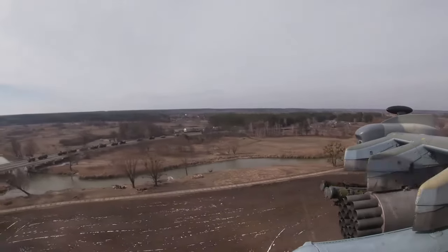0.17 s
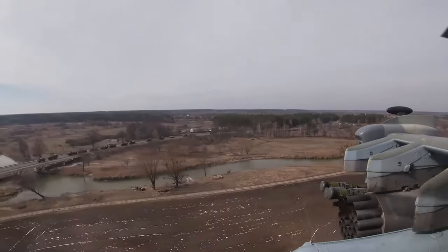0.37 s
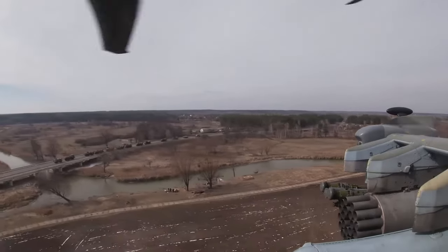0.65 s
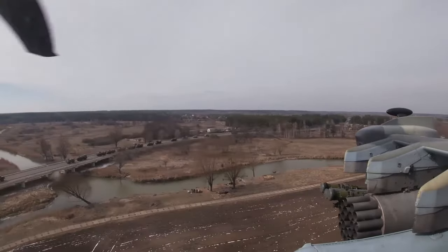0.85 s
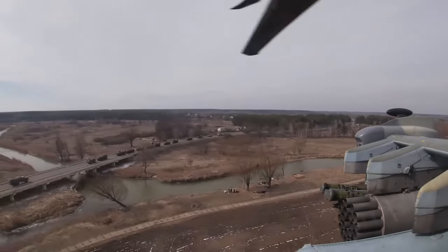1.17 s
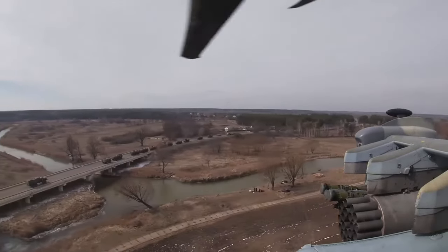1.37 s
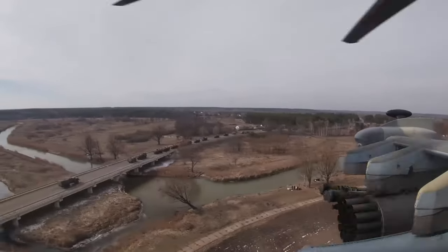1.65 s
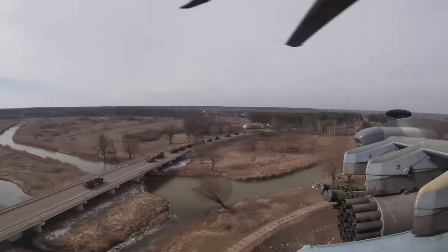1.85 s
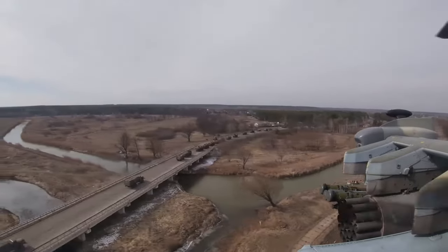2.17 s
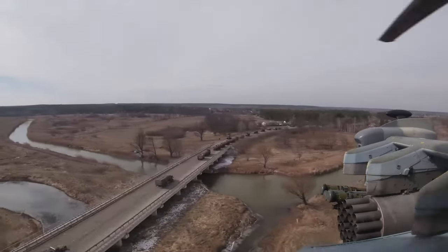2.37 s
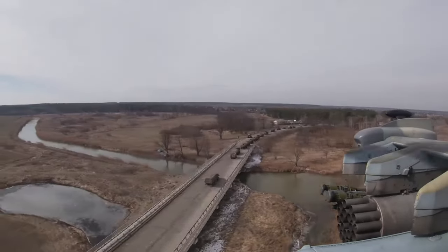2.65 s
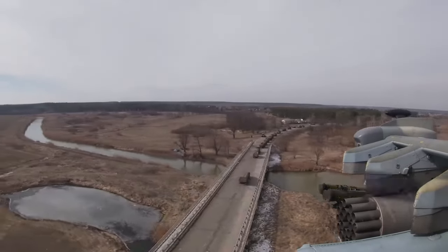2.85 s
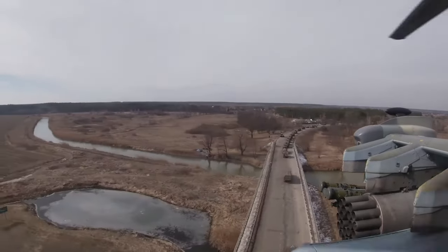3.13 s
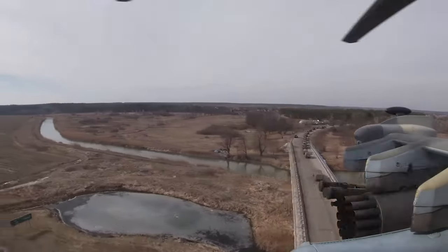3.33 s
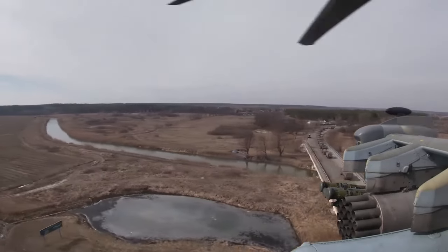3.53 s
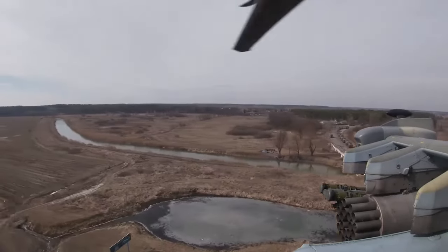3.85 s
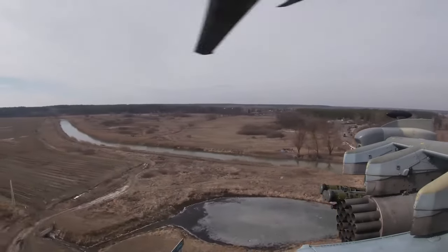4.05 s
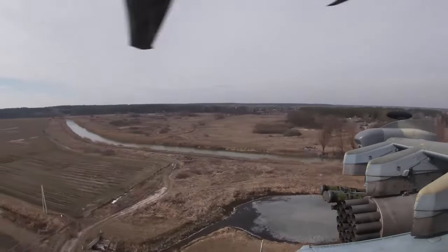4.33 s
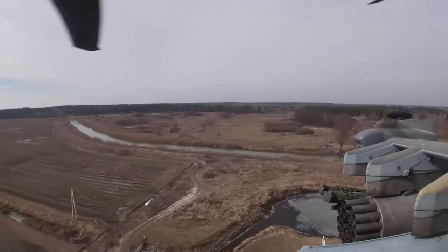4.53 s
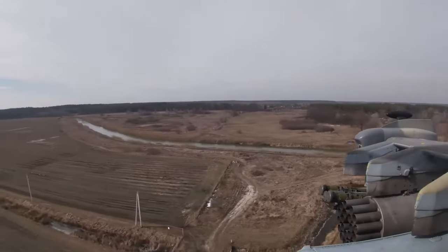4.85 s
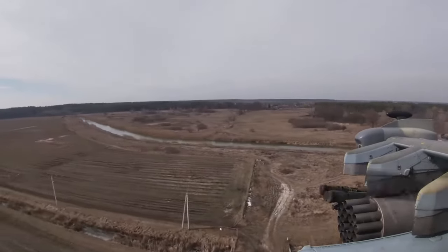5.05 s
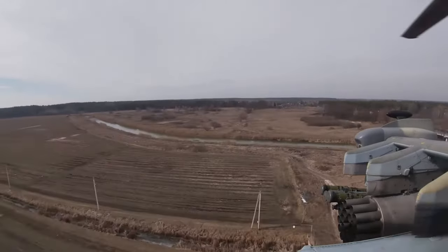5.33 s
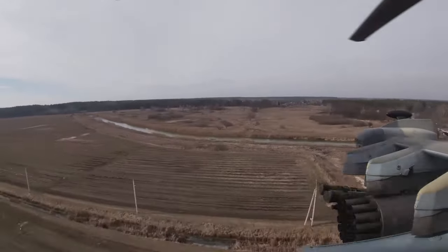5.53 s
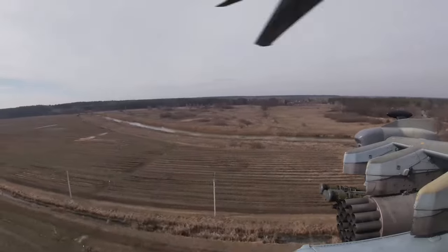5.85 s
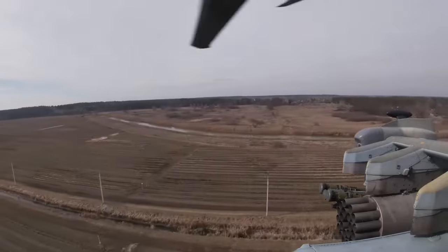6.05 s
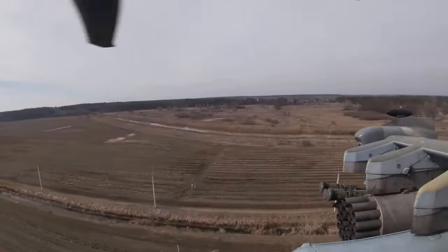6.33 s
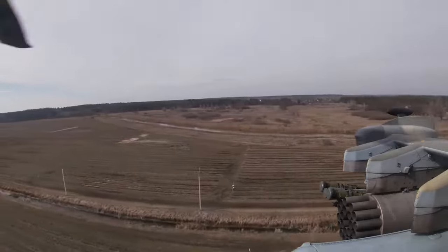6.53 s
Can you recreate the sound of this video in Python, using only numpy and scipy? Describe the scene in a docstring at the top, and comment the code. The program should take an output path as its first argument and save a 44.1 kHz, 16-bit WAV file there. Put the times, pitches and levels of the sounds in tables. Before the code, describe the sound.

A helicopter in low, fast flight is heard from a microphone fixed to its hull for about six and a half seconds. The main rotor throbs deep and fast throughout, mixed with rumbling, buffeting air and a strong, steady gearbox hum. In the first half second the blades give a quick run of raspy slaps over a hiss that clears soon after one second. The tail rotor adds a low drone, strongest around two seconds, and the turbine hisses faintly. Soft gusts howl along the hull near 1, 2, 3 and 3.7 seconds. A thin, high gear whine swells from about 1.5 to 3.3 seconds, drops back, and rises again around 6 seconds. Rotor and gear pitches sag very slightly around 4 seconds and recover by 6, with the throb sitting a little higher after the dip. The sound continues at full strength to the end.

```python
"""On the airframe of a helicopter in low, fast flight, heard from a camera fixed to the hull.
The main rotor throbs under buffeting air, and its blades slap a few times at the start.
The gearbox hums and whines, the tail rotor drones, the turbine hisses and gusts howl softly.
Rotor and gear pitches ride on the rotor speed, which sags once and recovers."""
import sys
import numpy as np
from scipy import signal
from scipy.fft import rfft, irfft, next_fast_len
from scipy.io import wavfile
from scipy.ndimage import uniform_filter1d, minimum_filter1d

SR = 44100
rng = np.random.default_rng(int(sys.argv[2]) if len(sys.argv) > 2 else 0)


def digitize_waveform(pressure):
    """Quantize a signal to 16-bit integers and store it at the path in sys.argv[1].

    Rows of a 2-D input are taken as channels; values are limited to [-1, 1].
    """
    field = np.atleast_2d(pressure).T
    bounded = np.clip(field, -1, 1)
    quanta = np.round(bounded * 32767).astype(np.int16)
    wavfile.write(sys.argv[1], SR, quanta)


N = 295181
T = np.arange(N) / SR
SHAFT_HZ, BLADES = 5.187, 3  # main rotor; rotor and gear pitches are given at nominal speed


def amp(db):
    """Decibels to gain."""
    return 10 ** (np.asarray(db) / 20)


def curve(rows):
    """An automation lane: straight lines through (time_s, value) points."""
    return np.interp(T, *np.transpose(rows))


def wander(rate_hz):
    """Smooth random modulation, rms 1, rolling off above the rate."""
    size = next_fast_len(N, True)
    hz = np.fft.rfftfreq(size, 1 / SR)
    rolloff = np.exp(-(hz / rate_hz) ** 2) * (hz > 0)
    motion = irfft(rfft(rng.standard_normal(size)) * rolloff, size)[:N]
    return motion / motion.std()


def coloured(x, spectrum):
    """An EQ that gives white noise of rms 1 the spectrum's power per Hz."""
    hz = np.fft.rfftfreq(N, 1 / SR)
    points_hz, points_db = np.transpose(spectrum)
    gain = amp(np.interp(np.log(hz + 1), np.log(points_hz), points_db, left=-200, right=-200))
    return irfft(rfft(x) * gain, N) * np.sqrt(SR / 2)


def noise(spectrum):
    """Noise with the given power per Hz."""
    return coloured(rng.standard_normal(N), spectrum)


def tone(cycles, db):
    """A sine of the given rms level with a random starting phase."""
    return np.sqrt(2) * amp(db) * np.sin(2 * np.pi * (cycles + rng.random()))


def noise_band(hz, width_hz):
    """A narrow band of noise, rms 1, that follows a pitch curve."""
    angle = 2 * np.pi * np.cumsum(hz) / SR
    return wander(width_hz) * np.cos(angle) + wander(width_hz) * np.sin(angle)


def blade_beat(clock, lag_s=0.0, sharpness=0.4):
    """A modulator: one short push from each passing blade."""
    passing = 2 * np.pi * BLADES * SHAFT_HZ * (clock - lag_s)
    return np.cos(passing) + sharpness * np.cos(2 * passing)


def compressor_whistle(level_db=-91, image_db=-103, width_hz=65, converter_hz=24000):
    """The compressor's faint, airy whistle, and its mirror image from the camera's converter."""
    # glide of the whistle: time_s, pitch_hz
    glide = [(0, 11010), (0.8, 11055), (2.2, 10995), (3.45, 10825), (4.6, 11020), (5.4, 11060),
             (6.65, 10950)]
    hz = curve(glide)
    whistle = noise_band(hz, width_hz) * amp(level_db)
    return whistle + noise_band(converter_hz - hz, width_hz) * amp(image_db)


def edge_howl(calm_db=-60.5, calm_hz=523.7, rise_hz_per_db=3.5, width_hz=65):
    """Eddies shed from an edge of the hull howl louder and higher in each gust."""
    # gusts over the edge: peak_s, level_db, half_width_s
    gusts = [(0.9, -48, .2), (1.821, -52, .22), (3.102, -53, .22), (3.678, -48.5, .3)]
    swells = sum(amp(db) * np.exp(-((T - peak_s) / half_s) ** 2) for peak_s, db, half_s in gusts)
    strength = np.hypot(amp(calm_db), swells)
    hz = calm_hz + rise_hz_per_db * (20 * np.log10(strength) - calm_db)
    return noise_band(hz, width_hz) * strength


def turbine_hiss(downwash, throb_db=0.4, flicker_db=0.4):
    """The turbine exhaust hisses and flutters in the downwash."""
    # colour of the exhaust: frequency_hz, density_db (power per Hz)
    spectrum = [(1400, -115), (1900, -88), (2150, -90), (2520, -89), (2830, -93.5), (3300, -93),
                (4000, -99.5), (4350, -99), (4730, -96), (5100, -100.5), (5500, -100), (5900, -106),
                (6200, -112.5), (7000, -122), (8200, -133), (11000, -125), (13000, -132), (14500, -148)]
    return noise(spectrum) * amp(throb_db * downwash + flicker_db * wander(25))


def tip_sizzle(beat, chop_db=3.0, uneven_db=0.2, grain_db=2.3):
    """Each blade tip adds a grainy sizzle as it passes."""
    # colour of the sizzle: frequency_hz, density_db
    spectrum = [(7000, -136), (9500, -130), (11300, -124), (13000, -131), (14000, -148)]
    return noise(spectrum) * amp(chop_db * beat + uneven_db * wander(28) + grain_db * wander(600))


def accessory_gear(speed, clock, pitch_hz=1192.7, core_db=-3.0, flicker_db=2, skirt_db=-3.5):
    """An accessory gear rings thinly and unevenly: a flickering core in a blurred skirt."""
    # fader on core and skirt together: time_s, gain_db
    fader = [(0, -55), (.35, -58), (.65, -63), (2.2, -62), (2.6, -66.5), (3.9, -64.5), (4.4, -63), (5, -59),
             (5.4, -64.5), (6.65, -66)]
    core = tone(pitch_hz * clock, core_db + flicker_db * wander(9.2))
    skirt = noise_band(pitch_hz * speed, width_hz=15) * amp(skirt_db)
    return (core + skirt) * amp(curve(fader))


def tail_rotor(clock, pitch_hz=103.3, octave_db=-12.5, flutter_db=1.0, drift_cycles=.03):
    """The tail rotor drones with a weak octave and beats against the main rotor."""
    # swell of the drone: time_s, level_db
    drone_level = [(0, -42.5), (.6, -39), (1.4, -36.5), (2, -35.5), (2.4, -40), (3.2, -40), (4.4, -44.5),
                   (5.5, -41.5), (6.3, -39.5)]
    db = curve(drone_level)
    cycles = pitch_hz * clock + drift_cycles * wander(3.5)
    drone = tone(cycles, db + flutter_db * wander(7))
    return drone + tone(2 * cycles, db + octave_db + flutter_db * wander(6))


def gearbox(clock, mesh_hz=368.0, whine_hz=1996.7, hum_flutter_db=0.22, whine_flutter_db=1.05,
            lesser_flutter_db=2.0, whine_drift_cycles=0.063, lesser_drift=.1):
    """Gear teeth sing through the airframe: a strong hum, a high whine and many lesser tones."""
    # main gear hum, softer while the rotor sags: time_s, level_db
    hum_level = [(0, -35.5), (.8, -34), (1.4, -32.5), (2.2, -33.5), (3, -33.5), (3.6, -35), (3.95, -36),
                 (4.55, -36.5), (5.3, -34.5), (6, -34), (6.65, -34.8)]
    # whine of the fast stage, two slow swells, the first with a brief crest: time_s, level_db
    whine_level = [(0, -68), (0.6, -67), (1.28, -61.5), (1.6, -57.5), (2.2, -56.5), (2.98, -59),
                   (3.26, -54), (3.4, -67), (4.2, -66.5), (5.1, -69.5), (5.57, -63), (5.66, -68.5),
                   (5.76, -62), (6.38, -58), (6.65, -62.5)]
    # lesser shaft and gear tones: pitch_hz, level_db
    lesser_tones = [(84.8, -46), (354.1, -51.5), (497.1, -58), (736.0, -62), (886.9, -77.5), (1104.1, -77),
                    (1473, -75), (2296.0, -76), (2374.5, -75.5), (2505.6, -76.5)]
    hum = tone(mesh_hz * clock, curve(hum_level) + hum_flutter_db * wander(30))
    whine_cycles = whine_hz * clock + whine_drift_cycles * wander(17)
    whine = tone(whine_cycles, curve(whine_level) + whine_flutter_db * wander(22))
    lesser = 0
    for hz, db in lesser_tones:
        twist = lesser_drift * np.sqrt(hz / mesh_hz) * wander(5.5)  # shaft twist blurs fast gears most
        lesser += tone(hz * clock + twist, db + lesser_flutter_db * wander(10))
    return hum + whine + lesser


def blade_slaps(trim_db=-1.5, wake_db=-3.0, wake_s=1.0, grain_db=2.5, crack_db=-1, crack_s=.001):
    """Blades cut the wake of the blade before: cracks in short rasps, over a hiss that soon clears."""
    # blade strikes: start_s, gain_db, rise_s
    strikes = [(0.0, 2, .003), (.054, 7.5, .0058), (.120, 7, .006), (.185, 6, .004), (.2585, 14.5, .0019),
               (.377, 8, .0058), (.445, 5.5, .004)]
    # slap EQ, with three broad hull resonances: frequency_hz, density_db
    hull_colour = [(400, -92.5), (900, -84.5), (1300, -84), (1550, -80.5), (1850, -86.5), (2350, -83),
                   (3100, -96), (3800, -97.5), (4200, -92.5), (4750, -90.5), (5600, -101), (6400, -110),
                   (8200, -127), (11000, -123), (14000, -145)]
    bursts, cracks = 0, np.zeros(N)
    for start_s, db, rise_s in strikes:
        age = np.maximum(T - start_s, 0) / rise_s
        bursts += amp(db) * age * np.exp(1 - age)
        # one impulse at the peak packs the energy of crack_s of noise
        cracks[round((start_s + rise_s) * SR)] = amp(db + crack_db) * np.sqrt(crack_s * SR)
    wake = amp(wake_db) * np.exp(-np.minimum(T / wake_s, 2) ** 4)
    rasps = rng.standard_normal(N) * np.hypot(bursts * amp(grain_db * wander(700)), wake)
    return coloured(rasps + cracks, hull_colour) * amp(trim_db)


def hull_rush(downwash, sway_db=0.86, flicker_db=0.2, throb_db=0.5):
    """Air rushes along the hull, pushed by every passing blade."""
    # colour of the airflow: frequency_hz, density_db
    spectrum = [(200, -100), (262, -75), (300, -64.5), (345, -60.5), (390, -64.5), (470, -70), (580, -73.5),
                (635, -76.5), (760, -77.5), (950, -83), (1280, -84), (1470, -85.5), (1700, -87.5),
                (2100, -110)]
    return noise(spectrum) * amp(sway_db * wander(1.0) + flicker_db * wander(30) + throb_db * downwash)


def buffeting(clock, trim_db=-1.0, load_share=0.31, gust_db=1.5, persistence=0.45):
    """Turbulence rumbles on the camera, louder as the blades bite harder."""
    # colour of the turbulence: frequency_hz, density_db
    spectrum = [(10, -71), (30, -68.5), (50, -60.5), (65, -54.5), (90, -50), (115, -53.5), (145, -52.5),
                (175, -61), (240, -62.5), (265, -73), (330, -92.5)]
    # load on the rotor: time_s, load_db
    rotor_load = [(0, 3.5), (1.0, -1), (2.2, -0.8), (2.6, 1), (3.4, -1), (4.45, -1), (5.0, 2), (5.7, 2),
                  (6.1, 2), (6.65, 4)]
    eddies = noise(spectrum)
    weights = persistence ** np.arange(4)  # each eddy returns, weaker, on the next rotor turns
    wake = sum(weight * np.interp(clock - turn / SHAFT_HZ, clock, eddies, period=clock[-1])
               for turn, weight in enumerate(weights))
    gain_db = trim_db + load_share * curve(rotor_load) + gust_db * wander(4.9)
    return wake / np.linalg.norm(weights) * amp(gain_db)


def main_rotor(clock, deep_hz=(55, 70), throb_hz=(70, 100), unsteady_db=.5, drift_cycles=0.027,
               trim_db=0.14):
    """The blades' pressure waves throb; the weight moves to a higher band after the sag."""
    # rotor partials, strongest at multiples of the blade count: shaft_multiple, base_level_db
    partials = [(3, -47.5), (5, -60), (6, -46.5), (8, -51.5), (9, -44.5), (11, -53), (12, -42.5), (14, -55),
                (15, -41.5), (16, -46.5), (17, -45.5), (18, -42.5), (21, -50), (22, -54.5), (23, -53),
                (24, -45), (27, -50), (28, -54), (30, -55), (36, -56), (45, -59.5), (48, -60.5)]
    # fader on the deep band: time_s, gain_db
    deep_fader = [(0, -4), (.4, 3), (1.4, 5), (1.9, 2.5), (2.4, -8), (3.35, 3.5), (4, -2.5), (5.3, -1.5),
                  (6.1, -7.5), (6.65, -4)]
    # fader on the throb band above it: time_s, gain_db
    throb_fader = [(0, -3), (.8, -1), (1.3, -4.5), (2.2, -4), (2.6, -2), (3.3, -3), (4.4, 4), (5.1, 0.5),
                   (6.65, 2.5)]
    deep_db, throb_db = curve(deep_fader), curve(throb_fader)
    start_phase = rng.random()
    waves = 0
    for order, db in partials:
        hz = order * SHAFT_HZ
        # multiples of the blade rate lock into two thumps per blade; the rest run loose
        locked_phase = start_phase + (order / BLADES / 2) ** 2
        phase = locked_phase if order % BLADES == 0 else rng.random()
        swell_db = deep_db * (deep_hz[0] < hz < deep_hz[1]) + throb_db * (throb_hz[0] < hz < throb_hz[1])
        level = amp(db + swell_db + unsteady_db * wander(1.6))
        cycles = hz * clock + phase + drift_cycles * wander(3.6)
        waves += np.sqrt(2) * level * np.sin(2 * np.pi * cycles)
    return waves * amp(trim_db)


def scene():
    """The mono mix: one drive train paces the rotors, the gears and the pulsing of the air."""
    # rotor speed: time_s, share_of_nominal_speed
    rotor_speed = [(0.0, 0.9927), (0.33, 0.9933), (0.83, 0.9982), (2.91, 1.006), (3.62, 0.9914),
                   (4.05, 0.9864), (5.04, 0.9961), (6.04, 1.0032), (6.65, 1.0013)]
    speed = curve(rotor_speed)
    clock = np.cumsum(speed) / SR  # runs fast or slow with the rotor
    beat = blade_beat(clock)
    downwash = blade_beat(clock, lag_s=.0395)  # reaches the hull after the blade's sizzle
    drive = main_rotor(clock) + tail_rotor(clock) + gearbox(clock)
    drive += accessory_gear(speed, clock) + compressor_whistle()
    air = buffeting(clock) + hull_rush(downwash) + edge_howl()
    air += turbine_hiss(downwash) + tip_sizzle(beat) + blade_slaps()
    return (drive + air)[None]


def record(dry, input_db=0.17, threshold_db=-20.5, slope=0.8, stop_s=6.65, fade_s=.002, cutoff_hz=15000):
    """The camera's limiter eases the peaks down; the sound cuts out and a low-pass trims the top."""
    x = dry * amp(input_db)
    gain = np.minimum(1, amp(threshold_db) / (abs(x[0]) + 1e-9)) ** slope
    held = minimum_filter1d(gain, size=400)
    smoothed = uniform_filter1d(uniform_filter1d(held, size=200), size=200)
    gate = np.clip((stop_s - T) / fade_s, 0, 1)
    lowpass = signal.firwin(511, cutoff_hz, window=("kaiser", 9), fs=SR)
    return signal.oaconvolve(x * smoothed * gate, lowpass[None], "same")


dry = scene()
out = record(dry)
digitize_waveform(out)
```